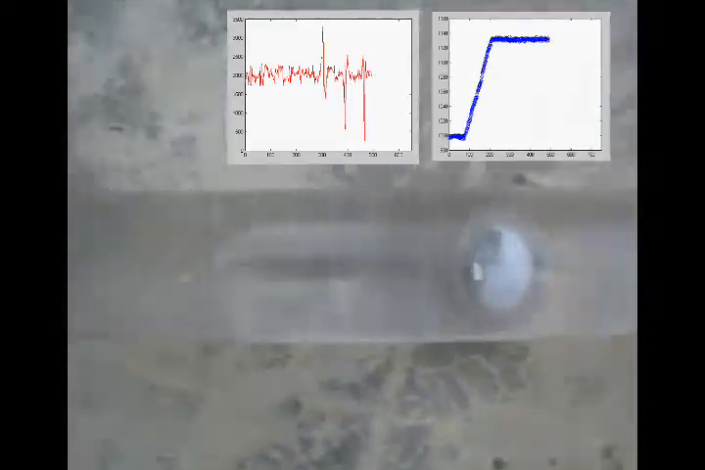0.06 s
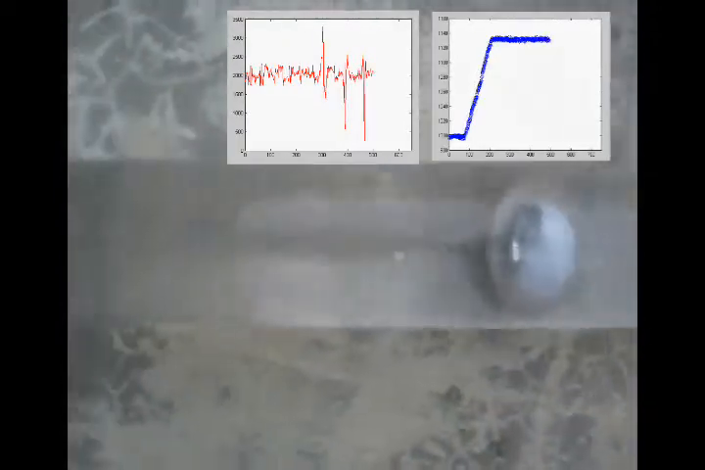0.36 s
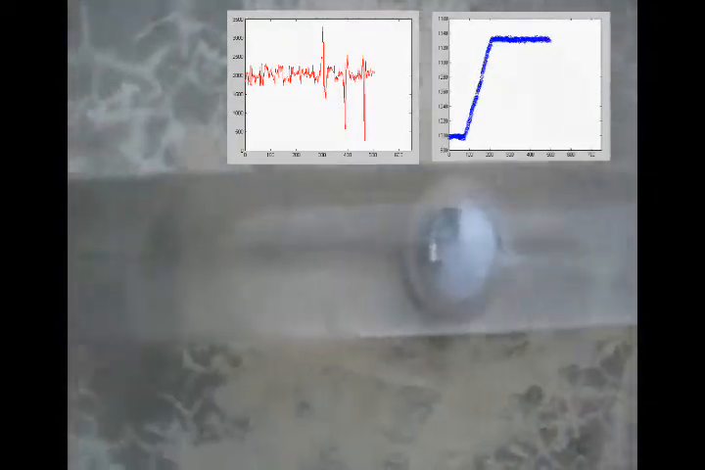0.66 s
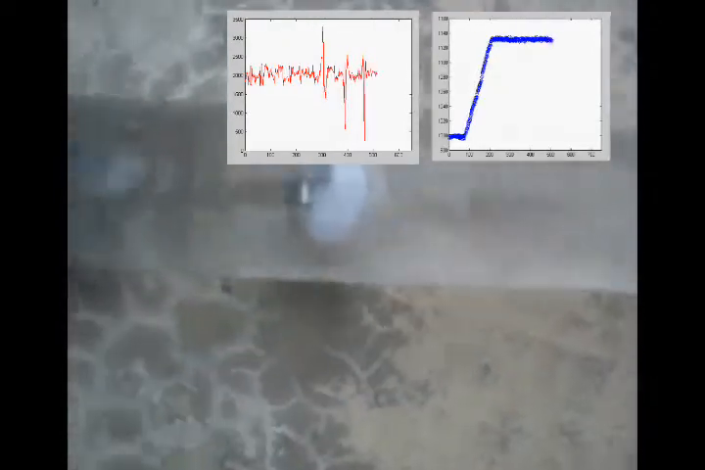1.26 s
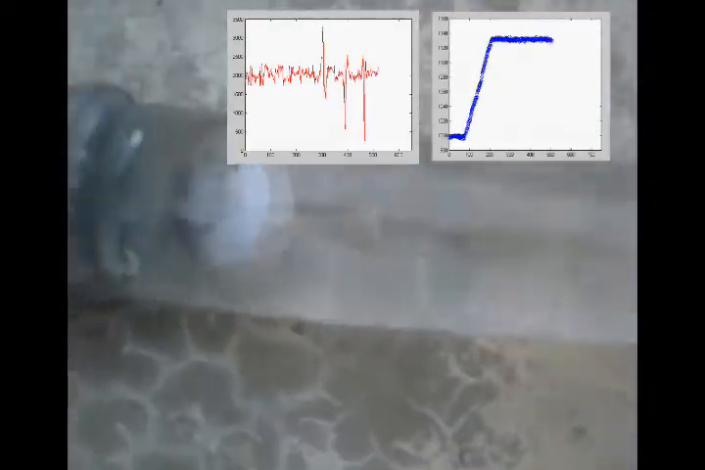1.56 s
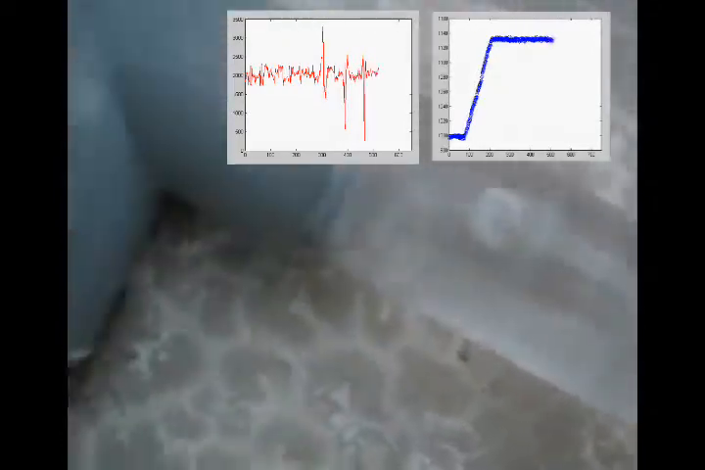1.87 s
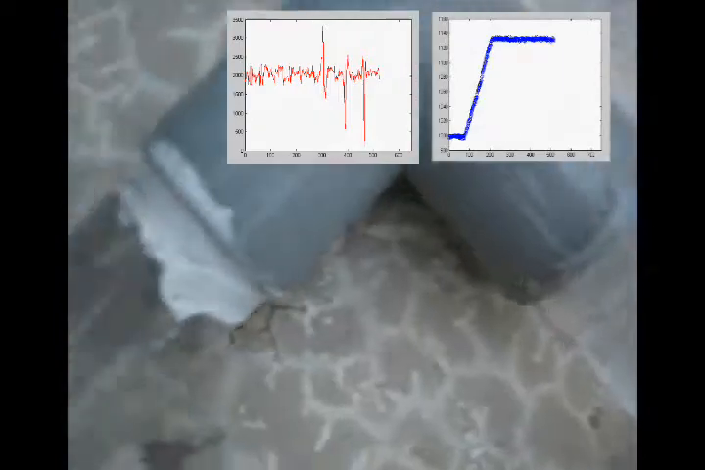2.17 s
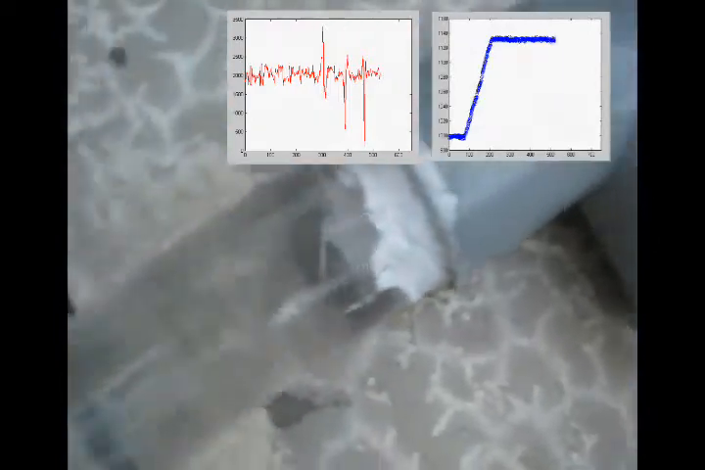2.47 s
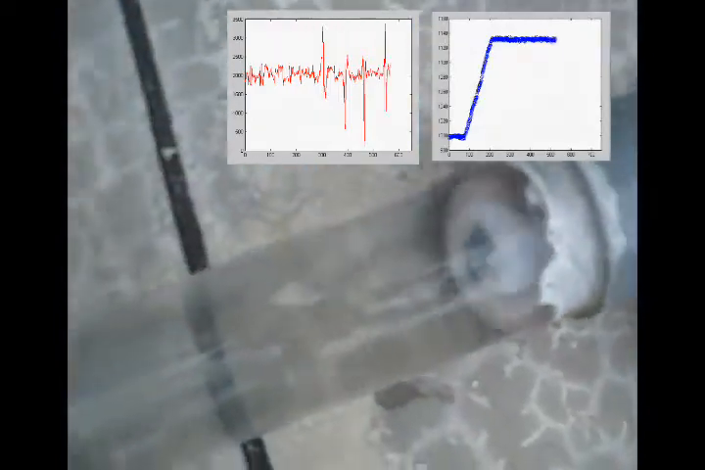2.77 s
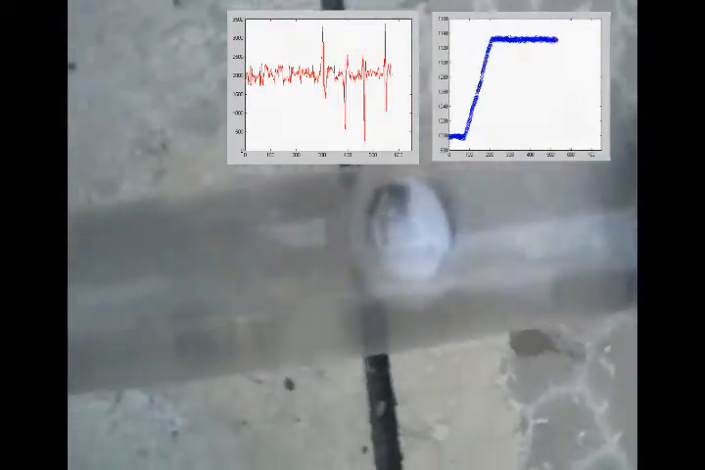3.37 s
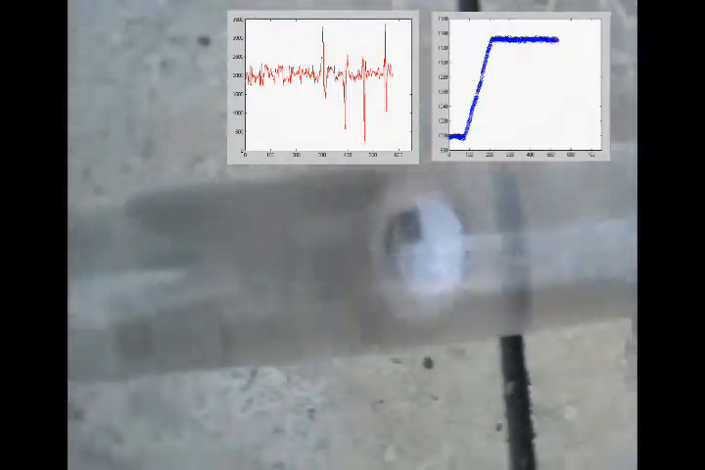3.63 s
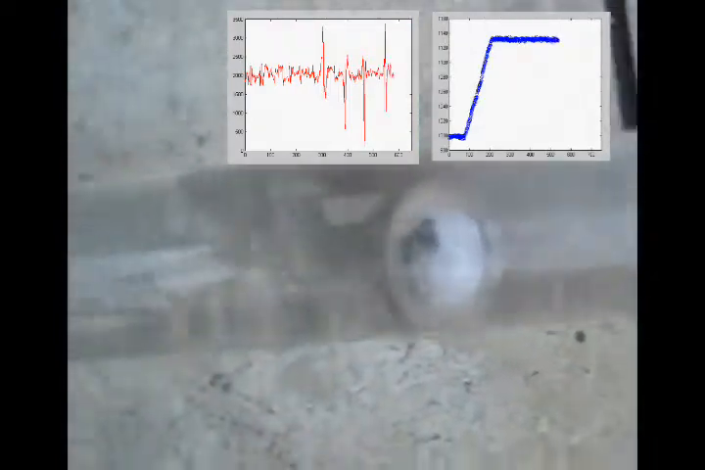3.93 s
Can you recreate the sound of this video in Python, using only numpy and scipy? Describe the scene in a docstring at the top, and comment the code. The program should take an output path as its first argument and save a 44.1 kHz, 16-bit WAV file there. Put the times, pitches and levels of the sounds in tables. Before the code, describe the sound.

Close, rumbling water flow inside a plastic pipe, with light bubbling over a low hum.

```python
"""Water rushes steadily through a plastic pipe, close by, carrying a ball along.
The turbulent flow rumbles and hisses over a pump's hum and stirs the pipe's low resonances;
a low drone climbs as the ball travels round a bend. Small bubbles chirp and splashes tick
over a fine trickle and soft gurgles, and two larger air pockets plop."""
import sys
import numpy as np
from scipy import signal
from scipy.fft import rfft, irfft
from scipy.io import wavfile

SR = 44100
rng = np.random.default_rng(int(sys.argv[2]) if len(sys.argv) > 2 else 0)


def wav_record(signal):
    """Record a signal, one row per channel, as 16-bit PCM in the file named by sys.argv[1]."""
    frames = np.transpose(np.atleast_2d(signal))
    bounded = np.clip(frames, -1, 1)
    # unit amplitude maps onto the largest positive 16-bit level
    quanta = np.round(bounded * 32767).astype(np.int16)
    wavfile.write(sys.argv[1], SR, quanta)


N = 176400
TIME = np.arange(N) / SR
AGE = TIME[:SR // 10]   # time since the start of a short sound [s]


def rush():
    """Turbulence: third-octave noise bands, each fluttering on its own; rumble and hiss swell apart."""
    # tone colour of the flow: (frequency [Hz], relative density [dB])
    spectrum = [(25, -22), (34, -3), (45, -3), (62, 0.5), (100, 0), (145, -6), (230, -8.5), (350, -12.5),
                (480, -15.5), (680, -21), (1100, -25), (1650, -31), (2300, -35), (3100, -39), (4000, -43),
                (5400, -56)]
    # swell of the hiss: (time [s], gain [dB])
    hiss_swell = [(0, 1.5), (.45, 0.5), (.85, 1.5), (1.15, -0.4), (1.5, -1.5), (2.0, -1), (2.6, 0),
                  (3.15, -1), (3.45, .5), (3.85, -1.5), (4, 1.5)]
    # swell of the rumble: (time [s], gain [dB])
    rumble_swell = [(0, -4), (.45, 1), (.7, -3), (.9, 1.5), (1.15, 0), (1.8, -1), (2.35, 1), (2.8, 1),
                    (3.3, 2), (3.65, -4.5), (3.82, 3), (3.9, -2.5), (4, 3)]
    level_db, flutter_db = -27.5, 0.73
    rumble_below_hz, hiss_above_hz = 140, 1200
    hiss_db, = in_time(hiss_swell)
    rumble_db, = in_time(rumble_swell)
    points_hz, points_db = np.transpose(spectrum)
    edges = 25 * 2 ** (np.arange(25) / 3)
    white = rng.standard_normal((2, N + SR))
    out = np.zeros(N)
    for k, (low, high) in enumerate(zip(edges, edges[1:])):
        hz = np.sqrt(low * high)
        band = bandpass(white[k % 2], low, high)[SR:]   # neighbouring bands get independent noise
        band_db = np.interp(np.log(hz), np.log(points_hz), points_db) + flutter_db * drift(15)
        swell_db = hiss_db * (hz > hiss_above_hz) + rumble_db * (hz < rumble_below_hz)
        out += band * from_db(band_db + swell_db)
    return from_db(level_db) * rms_one(out)


def drone():
    """A wavering low tone that climbs as the ball moves along the pipe."""
    # path of the drone: (time [s], pitch [Hz], rms level [dB])
    climb = [(0, 57.62, -55), (1.24, 57.61, -50.5), (1.36, 61.75, -23.5), (1.58, 64.43, -34.5),
             (1.76, 70.09, -32.5), (2.1, 76.26, -26), (2.25, 77.2, -40), (2.45, 79.46, -38),
             (2.58, 81.63, -32.5), (2.76, 84.6, -48), (3.0, 87.63, -32), (3.35, 84.8, -47),
             (3.5, 93.6, -47), (3.62, 88.2, -26.5), (3.72, 98.3, -41.5), (3.82, 107.2, -30.5),
             (4, 110, -35.5)]
    waver_hz = 2
    hz, db = in_time(climb)
    phase = 2 * np.pi * np.cumsum(hz + waver_hz * drift(6.8)) / SR
    return from_db(db) * np.sqrt(2) * np.sin(phase)


def plops():
    """Large air pockets: a dull, rounded note lifting in pitch over a low thump."""
    # air pockets: (time [s], peak level [dB], mid pitch [Hz])
    pockets = [(.0075, -15.5, 490), (0.947, -15.5, 780)]
    cycles, glide_ratio = 2.6, 1.21
    thump_hz, thump_db = 181, -1
    thump = np.sin(2 * np.pi * thump_hz * AGE) * fade(t60_s=0.028)
    out = np.zeros(N)
    for s, db, hz in pockets:
        add(out, s, from_db(db) * chirp(hz / glide_ratio, hz * glide_ratio, cycles / hz))
        add(out, s, from_db(db + thump_db) * thump)
    return out


def bubbles():
    """Small bubbles chirp, mostly upwards, each with a little spray and two smaller pops."""
    # chirps: (time [s], peak level [dB], start pitch [Hz], end pitch [Hz], length [s])
    chirps = [(.068, -39.5, 2290, 2750, .009), (0.096, -33, 1550, 2760, 0.0049),
              (0.0972, -37.5, 2970, 3680, 0.0066), (0.166, -35.5, 1200, 1310, .012),
              (0.17, -35, 1850, 2970, 0.0084), (0.408, -39.5, 2770, 4500, 0.0065),
              (0.429, -41, 3930, 4230, 0.0054), (0.448, -39.5, 2560, 3650, 0.009),
              (.575, -37, 2480, 2880, 0.0076), (0.621, -41.5, 3390, 4010, 0.0054),
              (1.0271, -32, 2840, 3360, 0.0055), (1.077, -34.5, 3080, 3260, 0.0033),
              (1.194, -40.5, 3230, 3250, 0.0053), (1.212, -37, 2750, 3420, 0.0072),
              (1.25, -35.5, 3050, 3200, 0.0096), (1.275, -29, 1300, 1425, 0.0098),
              (1.330, -36.5, 2570, 3570, .007), (1.336, -37.5, 2280, 2530, .007),
              (2.0452, -28.5, 3510, 3850, .006), (2.074, -34.5, 2740, 2220, 0.0029),
              (2.125, -39, 2950, 3010, 0.0061), (2.174, -38, 2340, 3550, .013),
              (2.2, -30, 2080, 3070, 0.0036), (2.325, -33.5, 2300, 2060, 0.0097),
              (2.361, -32, 2440, 2510, 0.0069), (2.373, -37, 2420, 2920, .005),
              (2.429, -40, 4050, 4160, .005), (2.6163, -31.5, 2180, 2350, 0.0035),
              (2.62, -36.5, 1840, 1900, .006), (2.679, -37, 2960, 3640, 0.0063),
              (2.924, -39, 2560, 2900, 0.0073), (2.992, -35, 2600, 2750, 0.0038),
              (3.367, -35, 2300, 2540, 0.0049), (3.452, -37.5, 3090, 2850, 0.012),
              (3.497, -38.5, 4170, 4250, .005), (3.617, -38.5, 3460, 4050, 0.0031),
              (3.636, -36.5, 3850, 4080, .005), (3.643, -38.5, 4070, 4250, 0.0046),
              (3.712, -34, 2620, 4230, 0.0055)]
    pop_db, pop_within_s, pop_spread_octaves = -12, 0.011, 0.088
    out = np.zeros(N)
    for s, db, start_hz, end_hz, length_s in chirps:
        add(out, s, from_db(db) * chirp(start_hz, end_hz, length_s))
        add(out, s, from_db(db) * .4 * spray(start_hz))
        for delay, detune in zip(rng.random(2), rng.standard_normal(2)):
            pop = spray(end_hz * 2 ** (pop_spread_octaves * detune))
            add(out, s + pop_within_s * delay, from_db(db + pop_db) * pop)
    return out


def splashes():
    """Tiny splashes: bright ticks of spray."""
    # ticks: (time [s], peak level [dB], centre [Hz])
    ticks = [(0.449, -40, 4270), (0.5595, -40, 4700), (0.686, -44.5, 4350), (0.7703, -42, 4740),
             (1.387, -37.5, 3200), (1.7194, -39, 4300), (1.766, -39, 4860), (2.098, -36.5, 2930),
             (2.1313, -38.5, 5020), (2.195, -28, 2630), (2.325, -37.5, 3170), (2.558, -25.5, 2930),
             (2.568, -36, 2500), (2.628, -36, 2820), (2.946, -42, 5080), (3.0874, -40.5, 4400),
             (3.185, -40.5, 4280), (3.2157, -37.5, 4710), (3.392, -39, 3520), (3.417, -41.5, 4520),
             (3.45, -39.5, 3550), (3.5445, -35, 3030), (3.6465, -35.5, 3080), (3.6872, -42, 3600),
             (3.8151, -31.5, 2570)]
    out = np.zeros(N)
    for s, db, hz in ticks:
        add(out, s, from_db(db) * spray(hz))
    return out


def gurgles():
    """Brief swells of churned air and water, fluttering around one pitch."""
    # swells: (time [s], length [s], rms level at the crest [dB], centre [Hz])
    swells = [(0.059, 0.22, -52.5, 1950), (0.354, .35, -35.5, 287), (0.756, 0.14, -46, 1894),
              (1.09, 0.16, -49, 1300), (2.176, 0.18, -30, 166), (2.277, 0.18, -29, 102.6),
              (2.532, 0.058, -47.5, 2225), (3.775, 0.091, -49.5, 2400)]
    width_share, flutter_db = .48, 3.5
    out = np.zeros(N)
    for s, length_s, db, hz in swells:
        churn = rng.standard_normal(N) * from_db(flutter_db * drift(53))
        for _ in range(2):
            churn = resonance(churn, hz, width_share * hz)
        swell = np.sin(np.pi * np.clip((TIME - s) / length_s, 0, 1))
        out += from_db(db) * rms_one(churn) * swell
    return out


def trickle():
    """A fizz of countless tiny bubbles, coming in clumps, each chirping upwards by its own amount."""
    # strength and pitch of the fizz: (time [s], rms level [dB], centre [Hz])
    fizz = [(0, -56, 2740), (.1, -53, 2710), (.3, -55, 2874), (.45, -55.5, 2850), (.65, -58, 2865),
            (.95, -63, 2676), (1.08, -56.5, 3060), (1.35, -54.5, 2910), (1.5, -60, 2750), (1.8, -55, 2904),
            (2.15, -51, 2700), (2.48, -61, 2820), (2.62, -53.5, 2580), (2.85, -56, 2750), (3.1, -56, 3180),
            (3.3, -56, 3235), (3.42, -58, 2990), (3.82, -51.5, 3250), (4, -61.5, 3100)]
    base_rate_per_s, clump_db, size_spread_db = 450, 4, 4.5
    spread_octaves, max_half_rise_octaves, base_length_s = 0.307, 0.27, .006
    level_db, centre_hz = in_time(fizz)
    birth_chance = base_rate_per_s * from_db(clump_db * drift(12)) / SR
    births = np.flatnonzero(rng.random(N) < birth_chance)
    size = from_db(size_spread_db * np.minimum(rng.exponential(1, N), 4))
    detune = 2 ** (spread_octaves * rng.standard_normal(N))
    glide = 2 ** (max_half_rise_octaves * rng.random(N))
    length_s = base_length_s * 2 ** rng.uniform(-1.2, 1, N)
    out = np.zeros(N)
    for i in births:
        hz = centre_hz[i] * detune[i]
        ring = chirp(hz / glide[i], hz * glide[i], length_s[i])
        add(out, i / SR, size[i] / detune[i] * ring)   # lower bubbles ring louder
    return from_db(level_db) * rms_one(out)


def pump():
    """Unsteady hum at the pump's shaft and vane rates, with a steadier vane tone inside it."""
    # shaft and vane hum: (pitch [Hz], width [Hz], rms level [dB])
    hum_bands = [(33.76, 3.6, -43), (173.1, 3, -40.5)]
    # swell of the vane tone: (time [s], rms level [dB])
    vane_swell = [(0, -40), (1.0, -35), (1.5, -35.5), (1.9, -56.5), (2.25, -39.5), (2.7, -48.5), (4, -38)]
    vane_hz, waver_db = 176.2, 1.5
    hum = sum(from_db(db) * ringing_noise(hz, width_hz) for hz, width_hz, db in hum_bands)
    vane_db, = in_time(vane_swell)
    vane_tone = np.sqrt(2) * np.sin(2 * np.pi * vane_hz * TIME)
    return hum + from_db(vane_db + waver_db * drift(0.87)) * vane_tone


def pipe_modes():
    """The flow keeps a few low resonances of the water-filled pipe faintly sounding."""
    # resonances: (pitch [Hz], width [Hz], rms level [dB])
    modes = [(116.7, 9.9, -43), (214.7, 10, -51.5), (269.3, 24, -49.5), (346, 38, -41.5)]
    swell_db = 2.5
    return sum(from_db(db + swell_db * drift(2.2)) * ringing_noise(hz, width_hz)
               for hz, width_hz, db in modes)


def in_pipe(x):
    """Dense reflections along the pipe give each tick a short tail."""
    echo_db = -14
    tail = rng.standard_normal(len(AGE)) * fade(t60_s=0.16)
    echo = signal.fftconvolve(x, tail / np.linalg.norm(tail))[:N]
    return x + from_db(echo_db) * echo


def chirp(start_hz, end_hz, length_s):
    """A bubble's brief ring: it glides in pitch and swells faster than it dies."""
    progress = np.arange(0, 1, 1 / (length_s * SR))
    phase = 2 * np.pi * np.cumsum(start_hz * (end_hz / start_hz) ** progress) / SR
    return np.sin(phase) * np.sin(np.pi * progress ** 0.61) ** 2


def spray(hz):
    """A short dying burst of noise around one pitch; peak 1."""
    edge_ratio = 2 ** .27
    burst = rng.standard_normal(len(AGE)) * fade(t60_s=.015)
    tick = bandpass(burst, hz / edge_ratio, hz * edge_ratio)
    return tick / np.abs(tick).max()


def ringing_noise(hz, width_hz):
    """A resonance kept sounding by noise; rms 1."""
    return rms_one(resonance(rng.standard_normal(N + SR), hz, width_hz)[SR:])


def resonance(x, hz, width_hz):
    """Two-pole resonance."""
    r = np.exp(-np.pi * width_hz / SR)
    feedback = [1, -2 * r * np.cos(2 * np.pi * hz / SR), r * r]
    return signal.lfilter(np.array([1, 0, -1]) * (1 - r * r) / 2, feedback, x + 1e-18)


def bandpass(x, low_hz, high_hz):
    """Keep one band, with gentle slopes."""
    return signal.sosfilt(signal.butter(2, [low_hz, high_hz], "band", fs=SR, output="sos"), x)


def drift(rate_hz):
    """Smooth random wander of spread 1."""
    hop, settle = 40, 2000
    r = np.exp(-2 * np.pi * rate_hz * hop / SR)
    noise = rng.standard_normal(N // hop + settle + 2)
    slow = signal.lfilter([1], [1, -2 * r, r * r], noise)[settle:]
    return np.interp(np.arange(N) / hop, np.arange(len(slow)), rms_one(slow))


def fade(t60_s):
    """Exponential decay of a short sound."""
    return from_db(-60 * AGE / t60_s)


def in_time(rows):
    """Columns of a curve at every sample."""
    s, *columns = np.transpose(rows)
    return [np.interp(TIME, s, column) for column in columns]


def add(out, s, sound):
    """Mix a short sound in at time s."""
    start = max(int(s * SR), 0)
    out[start:start + len(sound)] += sound[:max(N - start, 0)]


def from_db(db):
    """Decibels to gain."""
    return 10 ** (np.asarray(db) / 20)


def rms_one(x):
    """Scale to unit rms."""
    return x / np.sqrt(np.mean(x ** 2) + 1e-20)


def scene():
    """Everything heard beside the pipe, in one channel."""
    bed = rush() + pump() + drone()
    sparkle = in_pipe(bubbles() + splashes() + trickle())
    return (bed + sparkle + gurgles() + plops() + pipe_modes())[None]


def record(dry):
    """A small camera's slow sampling mirrors the treble upwards, fading as it goes; the top is cut."""
    sampling_hz, mirror_db_per_hz, cutoff_hz = 11025, -.013, 8400
    step = SR // sampling_hz
    hz = np.arange(N // 2 + 1) * SR / N
    above_fold_hz = np.maximum(hz - sampling_hz / 2, 0)
    band_limited = irfft(rfft(dry) * (above_fold_hz == 0), N)
    sampled = band_limited * step * (np.arange(N) % step == 0)
    smooth = irfft(rfft(sampled) * from_db(mirror_db_per_hz * above_fold_hz), N)
    return signal.sosfilt(signal.ellip(10, .1, 80, cutoff_hz, fs=SR, output="sos"), smooth)


dry = scene()
out = record(dry)
wav_record(out)
```